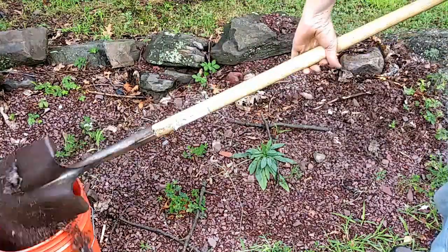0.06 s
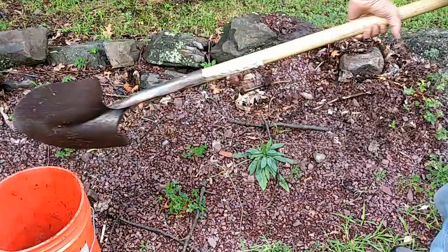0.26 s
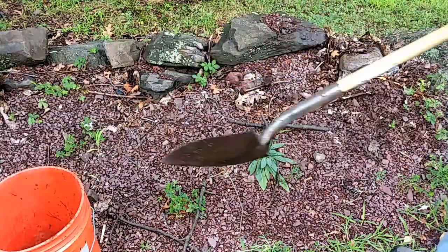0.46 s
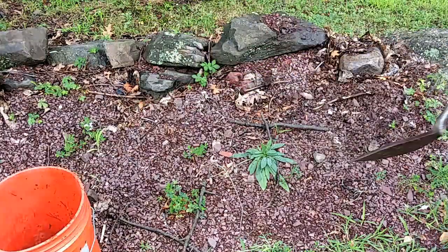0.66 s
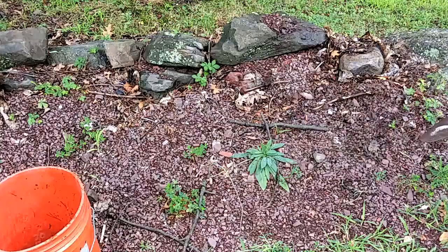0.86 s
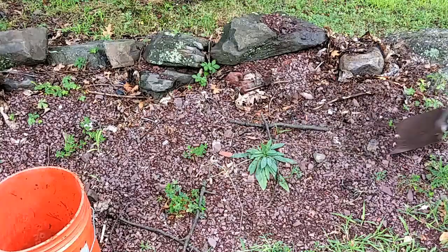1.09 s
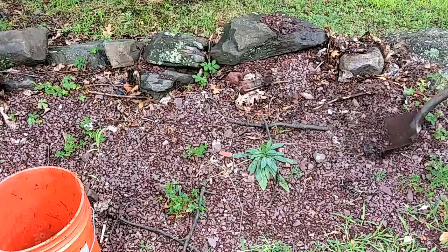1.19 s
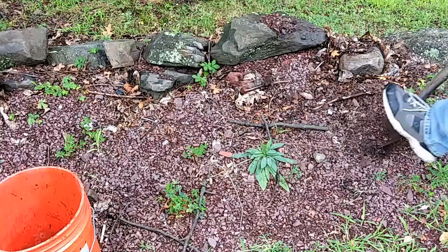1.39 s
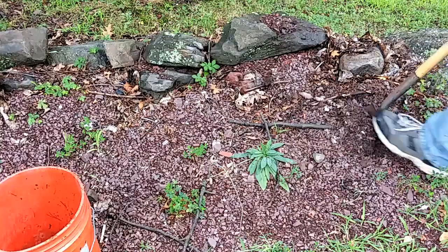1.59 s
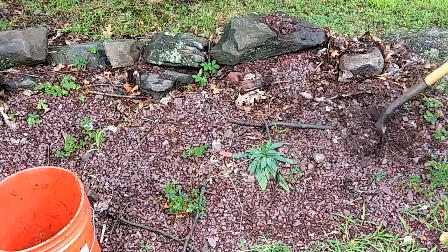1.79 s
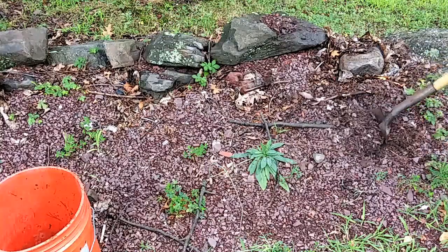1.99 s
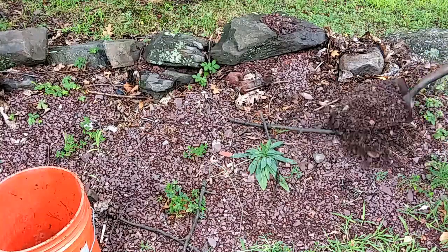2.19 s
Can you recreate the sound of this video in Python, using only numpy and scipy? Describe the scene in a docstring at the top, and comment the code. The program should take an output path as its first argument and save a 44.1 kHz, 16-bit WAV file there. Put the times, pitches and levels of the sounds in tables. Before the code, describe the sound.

A shovel tips crushed stone clattering into a plastic bucket, then stabs crunching into gravel again

```python
"""A faint far whistle hangs in quiet garden air, then a few stones rattle off a steel shovel close by.
The load of crushed stone drums on the walls of a plastic bucket, then on its bottom, with clinks in between.
Clothes rustle, a foot steps on the gravel, and the blade is stabbed in and trodden deeper; grit trickles after.
The foot steps back and the blade scrapes faintly, with hardly any echo around it.
Stones are random tiny impacts, filtered or ringing a body; air and cloth are filtered noise or dense impacts."""
import sys
import numpy as np
from scipy import signal
from scipy.fft import rfft, irfft, next_fast_len
from scipy.io import wavfile
from scipy.ndimage import map_coordinates

SR = 44100
rng = np.random.default_rng(int(sys.argv[2]) if len(sys.argv) > 2 else 0)


def pcm_store(signal):
    """Save signal as 16-bit PCM."""
    levels = np.round(np.clip(np.atleast_2d(signal), -1, 1) * 32767)
    wavfile.write(sys.argv[1], SR, levels.astype(np.int16).T)


N = 99225
TOP_HZ = 15900  # band limit of the recorder, and top of the range where stones click


def amp(db):
    """Decibels to gain."""
    return 10 ** (np.asarray(db) / 20)


def seconds():
    """The time of every sample."""
    return np.arange(N) / SR


def decay(t, t60):
    """Exponential fade that loses 60 dB in t60 seconds."""
    return np.exp(-np.log(1000) * t / t60)


def through(x, response):
    """x played through a response scaled to energy 1."""
    return signal.fftconvolve(x, response / np.linalg.norm(response))[:N]


def colour(x, points, size=8192):
    """Minimum-phase filter shaped by (Hz, dB) points, with its overall energy scaled to 1."""
    hz, db = np.transpose(points)
    bins = np.fft.rfftfreq(size, 1 / SR)
    gain = amp(np.interp(np.log(bins + 1), np.log(hz + 1), db))
    # Folding the cepstrum forward in time makes the filter causal.
    cepstrum = irfft(np.log(np.maximum(gain, 1e-6)))
    cepstrum[1:size // 2] *= 2
    cepstrum[size // 2 + 1:] = 0
    return through(x, irfft(np.exp(rfft(cepstrum))))


def ring(x, modes):
    """x rings a body whose (Hz, dB, t60 s) modes are decaying sines of alternating sign."""
    t = np.arange(SR // 2) / SR
    response = np.zeros(len(t))
    for k, (hz, db, t60) in enumerate(modes):
        response += (-1) ** k * amp(db) * np.sin(2 * np.pi * hz * t) * decay(t, t60)
    return through(x, response)


def contacts(rate, spread_db):
    """Random tiny impacts of uneven size, about rate a second, scaled to rms 1."""
    chance, size, sign = rng.random(N), rng.standard_normal(N), rng.choice([-1, 1], N)
    x = (chance < rate / SR) * sign * amp(spread_db * np.clip(size, -2, 2))
    return x / (x.std() + 1e-12)


def wobble(rate):
    """A smooth random curve through rate knots a second."""
    return map_coordinates(rng.standard_normal(N // 10), [seconds() * rate], mode="wrap")


def chips(rate, spread_db, t60, clump_db, count=18):
    """Stones click in clumps, each size of stone with a brief ring at its own pitch."""
    x = np.zeros(N)
    for hz in np.linspace(2000, TOP_HZ, count) + rng.uniform(-250, 250, count):
        hits = contacts(rate / count, spread_db)
        x += hits + ring(hits, [(hz, 0, t60)])
    x *= amp(clump_db * wobble(220))
    return x / x.std()


def stroke(start, rise, hold, fall, db, sag=0):
    """Force of a movement: a smooth rise, a hold that sags in dB per s, then a fall in dB per s."""
    t = seconds() - start
    attack = np.sin(np.pi / 2 * np.clip(t / max(rise, 1e-4), 0, 1)) ** 2
    sagged = sag * np.clip(t - rise, 0, hold)
    fallen = fall * np.maximum(t - rise - hold, 0)
    return attack * amp(db - sagged - fallen)


def strokes(rows):
    """Sum of strokes, one for each row."""
    return sum(stroke(*row) for row in rows)


def blows(rows, modes, contact_s):
    """Each (s, peak dB, Hz) row rings briefly at its own pitch, with slightly scattered overtones."""
    out, t = np.zeros(N + SR), np.arange(SR // 8) / SR
    for at, db, hz in rows:
        tone = np.zeros(len(t))
        for ratio, level, t60 in modes:
            scattered = ratio ** rng.normal(1, .12)
            tone += amp(level) * decay(t, t60) * np.sin(2 * np.pi * hz * scattered * t)
        tone *= 1 - np.exp(-t / contact_s)  # a longer contact softens the onset
        out[round(at * SR):][:len(t)] += amp(db) * tone / np.abs(tone).max()
    return out[:N]


def garden(x, t60=0.15, wet_db=-20):
    """A faint scatter from the ground and a low stone wall, over quiet outdoor air of filtered noise."""
    # Air spectrum. Each row: frequency in Hz, relative level in dB.
    air_tone = [(25, -9.5), (75, 7), (130, 0), (260, -9), (800, -14.5), (1400, -11), (2400, -14), (3700, 1),
                (4400, -3.5), (5800, 4.5), (7300, -4.5), (9000, -24.5), (16000, -36.5)]
    t = np.arange(SR // 4) / SR
    tail = rng.standard_normal(len(t)) * decay(t, t60) * (t > .004)
    air = colour(rng.standard_normal(N), air_tone) * amp(1.2 * wobble(25))
    return x + amp(wet_db) * through(x, tail) + amp(-63) * air


def whistles():
    """Each distant whistle is a sine that swells and fades on a slightly unsteady pitch."""
    # Faint thin whistles far off. Each row: start in seconds, length in seconds, pitch in Hz, peak in dB.
    whistle_rows = [(-.03, .19, 3570, -66), (.45, .3, 3890, -68)]
    t, out = seconds(), np.zeros(N)
    for start, length, hz, db in whistle_rows:
        swell = np.sin(np.pi * np.clip((t - start) / length, 0, 1))
        out += amp(db) * swell * np.sin(2 * np.pi * hz * t + wobble(70))
    return out


def knocks():
    """Stones slide down the steel and rattle off it: impacts are filtered and also ring the blade."""
    # Stones knocking on the blade. Each row: start in seconds, force in dB.
    knock_rows = [(0.124, -25), (0.147, -39.5), (0.158, -30), (0.177, -31.5), (0.196, -31.5), (0.218, -23),
                  (0.777, -37), (1.05, -56)]
    # Stones sliding down it. Each row: start, rise and hold in seconds, fall in dB per second, force in dB.
    slide_rows = [(0.127, 0.044, 0.032, 403.5, -36)]
    # Spectrum of the knocks. Each row: frequency in Hz, relative level in dB.
    knock_tone = [(200, -38), (420, -19.5), (600, -6), (900, -2), (1500, 3), (2400, -4.5), (3100, -3),
                  (4200, -3), (6200, 0), (8500, -8.5), (16000, -29.5)]
    # Steel blade, damped by the gravel. Each row: mode in Hz, relative level in dB, t60 in seconds.
    blade_modes = BLADE_MODES
    force = strokes(slide_rows)
    for at, db in knock_rows:
        force += stroke(at, rise=0.0059, hold=0.00093, fall=1900, db=db)
    hits = force * contacts(rate=4000, spread_db=4)
    return amp(-3) * colour(hits, knock_tone) + amp(-12) * ring(hits, blade_modes)


def pour():
    """The load hits the bucket's walls, then its bottom, while the stones clink on each other."""
    # The load, then its last stones. Each row: start, rise and hold in seconds, fall in dB per second,
    # clatter force in dB, clink force in dB (both ahead of the mix below).
    pour_rows = [(0.193, 0.0035, 0.06, 489, -16, -20.5), (0.246, 0.019, 0.066, 287, -30.5, -31)]
    # Clumps landing on the bottom. Each row: start in seconds, force in dB.
    clump_rows = [(0.229, -28)]
    # Big stones striking the wall, each spot with its own pitch. Each row: start in s, peak in dB, pitch in Hz.
    wall_blows = [(.195, -12, 802), (.2165, -6, 1508), (.2195, -5, 1020), (.2355, -7, 763),
                  (.257, -13, 816), (.281, -19, 1880), (.3025, -22.5, 1350), (.307, -18.5, 864),
                  (.3235, -28, 1000), (.3385, -19.5, 1487)]
    # A struck spot. Each row: multiple of its pitch before scatter, relative level in dB, t60 in seconds.
    spot_modes = [(1, -0.5, .03), (1.45, -3.5, .022), (2.6, -10, .014)]
    # Bucket walls, then bucket bottom. Each row: mode in Hz, relative level in dB, t60 in seconds.
    wall_modes = [(587, 3, .075), (747, 4, .075), (778, -2, .08), (952, 2, .08), (1087, 2, .08),
                  (1165, 2, .08), (1318, -1, .09), (1416, 0, .09), (1531, 4, .11), (1610, 1, .11),
                  (1749, 0, .1), (1906, 1, .11), (1980, -1, .1)]
    bottom_modes = [(115, -13, .06), (172, -6, .07), (222, 2, .09), (262, -6, .08)]
    # Spectra of clatter and clink. Each row: frequency in Hz, relative level in dB.
    clatter_tone = [(60, -48.5), (130, -22.5), (230, -9.5), (330, -8.5), (480, -12.5), (600, -6.5),
                    (850, -3.5), (1550, -2.5), (2000, -3), (2430, -11), (3500, -19.5), (5200, -41)]
    clink_tone = [(1470, -25), (2500, -6.5), (3130, -2), (4240, -6), (6200, 0), (8270, -13), (16000, -28)]
    lag_s = 0.02  # the stones reach the bottom after the walls

    flow, landing, clink = np.zeros((3, N))
    for start, rise, hold, fall, clatter_db, clink_db in pour_rows:
        flow += stroke(start, rise, hold, fall, clatter_db)
        landing += stroke(start + lag_s, rise, hold - lag_s, fall, clatter_db)
        clink += stroke(start, rise, hold, fall, clink_db)
    hits, wall_hits, bottom_hits = [
        force * contacts(rate=1500, spread_db=3) for force in (flow, flow, landing)]
    clicks = clink * chips(rate=4500, spread_db=3.5, t60=.012, clump_db=1.2)
    thumps = sum(stroke(at, rise=.002, hold=0, fall=4500, db=db) for at, db in clump_rows)

    big_stones = blows(wall_blows, spot_modes, contact_s=0.00038)
    clatter = amp(-2.5) * colour(hits, clatter_tone)
    walls = amp(-6.5) * ring(wall_hits, wall_modes)
    bottom = ring(amp(-13) * bottom_hits + thumps, bottom_modes)
    return big_stones + clatter + walls + bottom + amp(0.44) * colour(clicks, clink_tone)


def rustle():
    """Cloth rubs in dense unsteady contacts as the arms move; the shovel's swing is a thin noise swish."""
    # Cloth rubbing. Each row: start, rise and hold in seconds, fall in dB per second, force in dB.
    rustle_rows = [(0.603, 0.008, .215, 198, -54), (2.003, 0.016, 0.31, 100, -54)]
    # Spectra of cloth and swish. Each row: frequency in Hz, relative level in dB.
    rustle_tone = [(700, -20.5), (1080, -18), (1280, 0), (1900, 3.5), (2400, -6.5), (3000, -1), (3800, -4),
                   (4300, -6), (6000, -0.5), (7500, -3.5), (9500, -29.5), (16000, -34)]
    swish_tone = [(3000, -19.5), (5800, -16), (7000, 9.5), (7800, -5), (9000, -34)]
    rub = strokes(rustle_rows) * contacts(rate=13000, spread_db=7.5) * amp(2.1 * wobble(32))
    swing = stroke(start=1.03, rise=0.06, hold=0.103, fall=400, db=-55.5)
    swish = swing * rng.standard_normal(N)
    return colour(rub, rustle_tone) + colour(swish, swish_tone)


def pebbles(life_s=.0013, below_db=-24, above_db=-24):
    """Single stones snap against a neighbour: decaying noise bursts, each filtered around its pitch."""
    # Clicks of single pebbles. Each row: start in seconds, peak in dB, pitch in Hz.
    pebble_rows = [(0.634, -39, 2270), (0.781, -35, 1720), (.811, -36.5, 2020), (1.047, -41, 5350),
                   (1.4576, -40, 5900), (1.852, -26, 6180), (1.9117, -35, 6200)]
    out = np.zeros(N)
    for at, db, hz in pebble_rows:
        t = seconds() - at
        burst = (t >= 0) * np.exp(-np.abs(t) / life_s) * rng.standard_normal(N)
        low_side = [(hz / 6, 2 * below_db), (hz / 2.5, below_db), (hz / 1.4, 0)]
        high_side = [(hz * 1.3, 0), (hz * 2, above_db), (hz * 6, 2 * above_db)]
        click = colour(burst, low_side + high_side)
        out += amp(db) * click / np.abs(click).max()
    return out


def foot():
    """The heel thuds down as low ringing blows, and gravel crunches or scuffs under the sole."""
    # Light scuffs over the gravel, then dull pushes of the shoe on the ground.
    # Each row: start, rise and hold in seconds, fall in dB per second, force in dB.
    scuff_rows = [(0.747, 0.022, 0.013, 298, -50), (2.134, 0.117, .03, 200, -43.5)]
    thud_rows = [(0.841, 0.016, 0.0045, 334, -38.5), (0.877, 0.014, 0.029, 284, -49),
                 (1.632, 0.0046, 0.013, 750, -36.5)]
    # Gravel under the sole. Each row: start, rise and hold in seconds, fall in dB per second,
    # crunch force in dB, fizz force in dB.
    step_rows = [(0.841, 0.044, 0.074, 237, -47.5, -47.5), (1.828, 0.048, 0.008, 387, -43.5, -52.5),
                 (1.828, 0.0186, 0.0047, 106, -74, -45.5)]
    # The shoe meeting the ground. Each row: start in seconds, peak in dB, pitch in Hz.
    heel_blows = [(.8445, -37.5, 215), (.857, -28, 252), (.891, -33.5, 617)]
    # Each row: multiple of the heel's pitch before scatter, relative level in dB, t60 in seconds.
    heel_modes = [(1, 5, 0.027), (1.5, -6.5, 0.042)]
    # Spectra of thud, crunch, fizz and scuff. Each row: frequency in Hz, relative level in dB.
    thud_tone = [(30, -42), (90, -15), (160, -6), (250, 4), (380, -5), (600, -3), (1500, -24.5),
                 (4000, -28.5)]
    crunch_tone = [(120, -16), (250, -15.5), (450, -4), (750, 1), (1600, -3.5), (2100, -6), (2500, -17),
                   (10000, -36)]
    fizz_tone = [(1000, -25), (2700, -8), (4200, -7), (6300, 0), (16000, -28)]
    scuff_tone = [(300, -32), (900, -11), (1700, 1.5), (2500, -4), (6200, 2), (9000, -6), (16000, -35.5)]

    thud = strokes(thud_rows) * contacts(rate=2500, spread_db=2)
    crunch, fizz = [
        strokes((*row[:4], row[column]) for row in step_rows)
        * contacts(rate=2500, spread_db=4) * amp(2 * wobble(90))
        for column in (4, 5)]
    scuff = strokes(scuff_rows) * contacts(rate=3200, spread_db=6.5)
    heel = blows(heel_blows, heel_modes, contact_s=0.0018)
    return (heel + colour(thud, thud_tone) + colour(crunch, crunch_tone)
            + colour(fizz, fizz_tone) + colour(scuff, scuff_tone))


def bites():
    """The edge grinds through the top stones, reaches the soil below, and loose grit runs after it."""
    # Blade driven into the gravel. Each row: start, rise and hold in seconds, fall in dB per second,
    # grit force in dB, soil force in dB (ahead of the mix), soil lag in seconds, trickle force in dB.
    bite_rows = [(1.1893, 0.0071, 0.055, 477, -18, -28.5, 0.013, -43),
                 (1.202, 0.0053, 0.0024, 714.5, -23, -27, 0, -60),
                 (1.562, 0.04, 0.026, 431, -25.5, -26, 0.0058, -43)]
    # Spectra of grit, soil and trickle. Each row: frequency in Hz, relative level in dB.
    grit_tone = [(1290, -29.5), (2100, -4), (2370, -18), (2900, -1), (3420, -4), (5440, -2.5), (7210, 1),
                 (8580, -7), (16000, -21.5)]
    soil_tone = [(60, -48), (150, -14.5), (350, -7.5), (700, 2), (1400, 4), (2100, 1.5), (2400, -36),
                 (4000, -62.5)]
    trickle_tone = [(1200, -58), (2300, -17), (3200, -14), (4300, -12), (5800, -5), (7200, -10.5),
                    (9000, -19), (16000, -42.5)]
    sag_db_per_s, trickle_db_per_s = 82.5, 100  # the blade slows; loose grit settles

    grit, soil, trickle = np.zeros((3, N))
    for start, rise, hold, fall, grit_db, soil_db, lag, trickle_db in bite_rows:
        grit += stroke(start, rise, hold, fall, grit_db, sag_db_per_s)
        soil += stroke(start + lag, rise, hold - lag / 2, fall, soil_db, sag_db_per_s)
        trickle += stroke(start, rise + hold, 0, trickle_db_per_s, trickle_db)
    grinding = grit * chips(rate=6000, spread_db=4.5, t60=.005, clump_db=1.8)
    crush = soil * contacts(rate=4800, spread_db=3.5)
    running = trickle * chips(rate=18000, spread_db=-0.5, t60=0.001126, clump_db=2.5)
    steel = amp(-15.0) * ring(crush + amp(-0.5) * grinding, BLADE_MODES)
    return (colour(grinding, grit_tone) + amp(-3) * colour(crush, soil_tone)
            + steel + colour(running, trickle_tone))


def scrape(waver_hz=20, flutter_db=4):
    """A faint sine, unsteady in pitch and level, as the blade shifts in the stones."""
    # Path of the tone before waver and flutter. Each row: time in seconds, pitch in Hz, rms level in dB.
    scrape_path = [(2.008, 760, -71), (2.125, 870, -77), (2.158, 850, -84), (2.18, 800, -62),
                   (2.25, 740, -58)]
    s, hz, db = np.transpose(scrape_path)
    pitch = np.interp(seconds(), s, hz) + waver_hz * wobble(99)
    level = np.interp(seconds(), s, db) + flutter_db * wobble(80)
    tone = np.sqrt(2) * np.sin(2 * np.pi * np.cumsum(pitch) / SR)
    return (seconds() > s[0]) * amp(level) * tone


# Steel blade, damped by the gravel. Each row: mode in Hz, relative level in dB, t60 in seconds.
BLADE_MODES = [(800, -4, .05), (1018, -3, .04), (1250, -1, .04), (1480, 1, .045), (2050, -2, .035),
               (2720, -6, .035), (3120, -2, .05), (5450, -2, .035), (6300, 0, .035)]


def scene():
    """All sources, close to the microphone or far off, in the garden."""
    shovel = pour() + knocks() + bites() + scrape()
    person = foot() + rustle()
    return garden(shovel + person + pebbles() + whistles())[None]


def record(dry):
    """The recorder keeps nothing above its band limit."""
    m = next_fast_len(N + SR // 2)
    in_band = np.fft.rfftfreq(m, 1 / SR) < TOP_HZ
    return irfft(rfft(dry, m) * in_band, m)[..., :N]


dry = scene()
out = record(dry)
pcm_store(out)
```